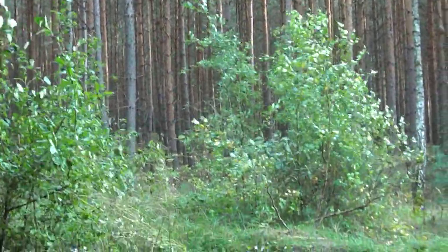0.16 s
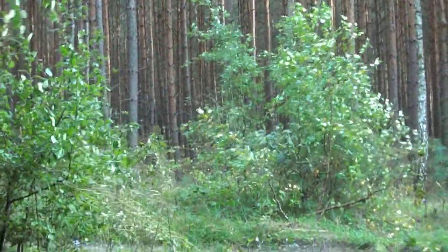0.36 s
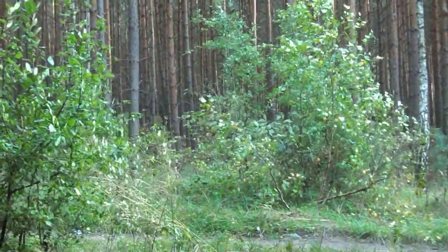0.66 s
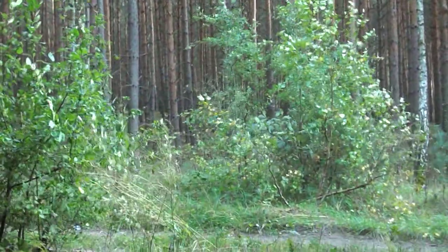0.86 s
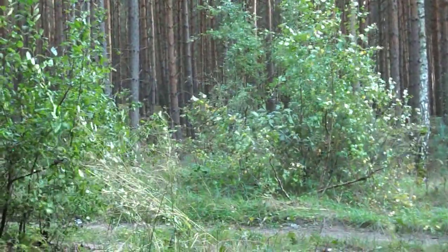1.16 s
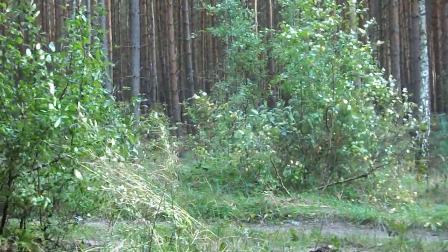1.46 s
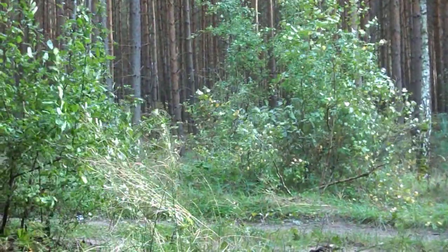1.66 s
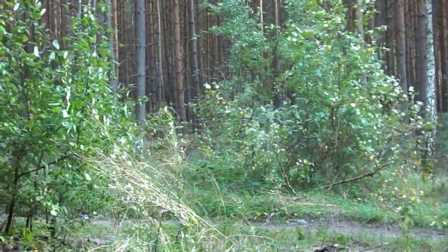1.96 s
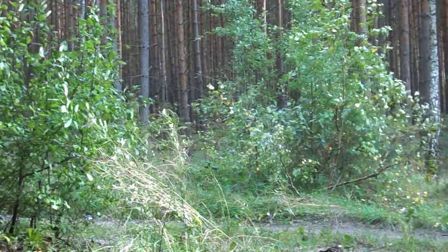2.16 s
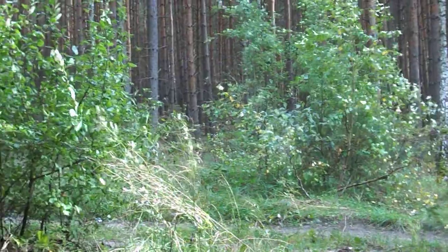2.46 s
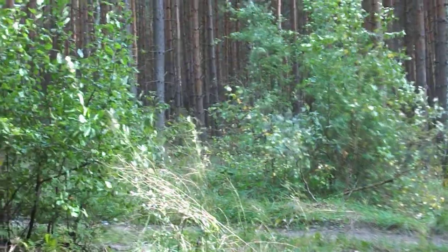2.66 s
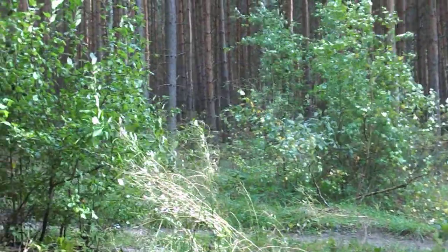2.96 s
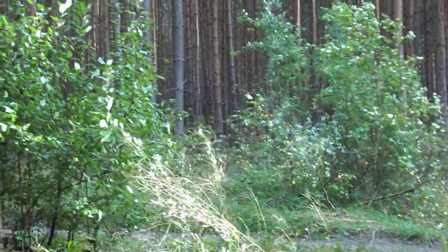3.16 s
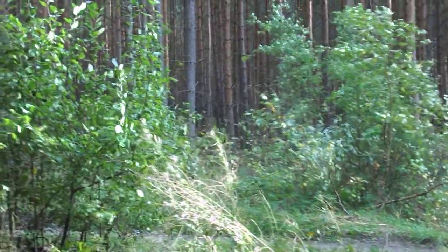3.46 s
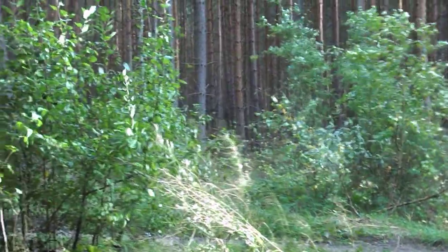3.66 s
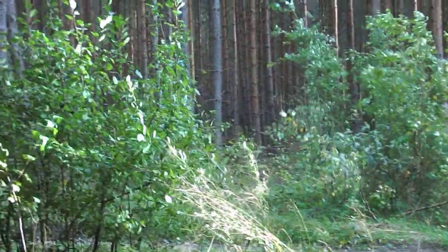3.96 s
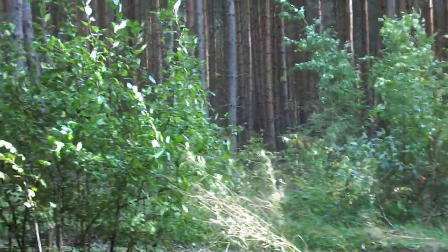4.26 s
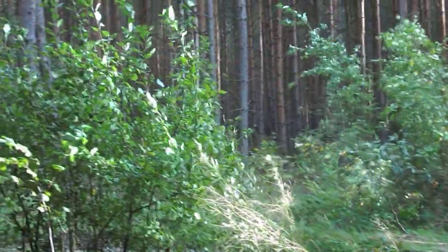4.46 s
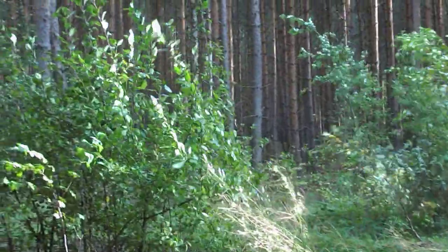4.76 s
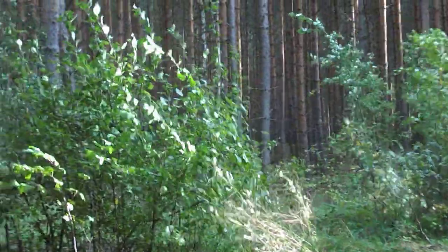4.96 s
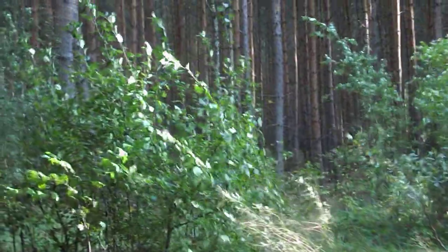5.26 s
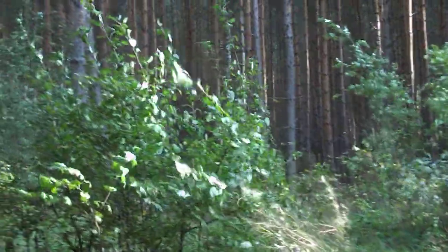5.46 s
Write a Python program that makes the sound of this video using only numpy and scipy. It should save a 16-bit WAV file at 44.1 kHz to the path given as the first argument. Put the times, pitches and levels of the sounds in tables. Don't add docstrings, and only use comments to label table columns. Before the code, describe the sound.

Wind in a pine forest: nearby young leaves rustle in a bright, dense hiss made of countless tiny ticks, over a quieter, smooth low roar from far crowns. The hiss slowly strengthens, holds, then eases slightly. A crisp leaf slap clicks just before the middle, with fainter ones around it. Small recorder outdoors, practically mono, slightly dull at the very top, with a barely perceptible thin whine.

```python
import sys
import numpy as np
from scipy import signal
from scipy.fft import rfft, irfft
from scipy.io import wavfile

SR = 44100
rng = np.random.default_rng(int(sys.argv[2]) if len(sys.argv) > 2 else 0)


def digitize_waveform(pressure):
    field = np.atleast_2d(pressure).T
    bounded = np.clip(field, -1, 1)
    quanta = np.round(bounded * 32767).astype(np.int16)
    wavfile.write(sys.argv[1], SR, quanta)


def field_ratio(decibels):
    return 10 ** (np.asarray(decibels, dtype=float) / 20)


N = 247842


def rms_one(x):
    return x / np.sqrt(np.mean(x ** 2) + 1e-20)


def at_hz(points, hz):
    points = np.array(points)
    return np.interp(np.log(hz + 1e-3), np.log(points[:, 0]), points[:, 1])


def drift(rate_hz):
    step, settling = 40, 2000
    pole = np.exp(-2 * np.pi * rate_hz * step / SR)
    draws = rng.standard_normal(N // step + settling + 2)
    slow = signal.lfilter([1], [1, -2 * pole, pole * pole], draws)[settling:]
    return np.interp(np.arange(N) / step, np.arange(len(slow)), rms_one(slow))


def patchy(source, spectrum, shared_db, own_db, slow_db):
    hz = np.arange(N // 2 + 1) * SR / N
    coloured = rfft(source) * field_ratio(at_hz(spectrum, hz))
    lowest_hz = 31.25
    place = 2 * np.log2(np.clip(hz, lowest_hz, 16000) / lowest_hz)
    together = drift(8.2)
    out = 0
    for band in range(19):
        share = np.clip(1 - abs(place - band), 0, 1)
        flicker_db = shared_db * together + own_db * drift(17.0) + slow_db * drift(0.86)
        out = out + field_ratio(flicker_db) * irfft(coloured * share, N)
    return rms_one(out)


def leaves(level_db):
    # frequency in Hz, level in dB.
    leaf_spectrum = [(300, -52), (1100, -13), (1700, -10.5), (2500, -9), (3300, -6.5), (3800, -5),
                     (5200, -3.5), (6500, -2.5), (7200, -2.5), (8300, -4), (8900, -6), (9500, -8.5),
                     (10200, -10)]
    ticks_per_second = 6000.0
    ticks = (rng.random(N) < ticks_per_second / SR) * rng.standard_normal(N)
    stream = rng.standard_normal(N)
    source = stream + field_ratio(-7.5) * rms_one(ticks)
    return field_ratio(level_db) * patchy(source, leaf_spectrum, shared_db=0.21, own_db=0.15, slow_db=0.34)


def slaps():
    # start in seconds, peak level in dB, frequency in Hz, 60 dB decay in seconds.
    slap_events = [
        (2.5524, -15, 5000, .0022),
        (1.9, -19, 6900, .002),
        (2.8, -25, 2300, 0.0036),
    ]
    out = np.zeros(N)
    t = np.arange(600) / SR
    onset = np.minimum(t / 0.00015, 1)
    for start_s, peak_db, hz, t60 in slap_events:
        at = round(start_s * SR)
        decay = field_ratio(peak_db - 60 * t / t60)
        out[at:at + len(t)] += decay * np.sin(2 * np.pi * hz * t) * onset
    return out


def crowns(level_db):
    # frequency in Hz, level in dB.
    crown_spectrum = [(15, -30), (31, -22), (42, -13.5), (115, -10), (180, -3), (270, -4), (500, -1),
                      (850, -0.5), (1050, -1.5), (1500, -7.5), (2600, -11.5), (6000, -40)]
    source = rng.standard_normal(N)
    return field_ratio(level_db) * patchy(source, crown_spectrum, shared_db=0.48, own_db=-0.2, slow_db=0.34)


def scene():
    # time in seconds, leaf rustle level in dB.
    gust_course = [
        (0, -33.5),
        (1.0, -32.5),
        (2.2, -31.5),
        (3.3, -30.5),
        (4.2, -30.5),
        (4.9, -31.5),
        (5.62, -31.5),
    ]
    time_s, strength_db = np.transpose(gust_course)
    gust_db = np.interp(np.arange(N) / SR, time_s, strength_db)
    swing_db = gust_db - gust_db.mean()
    crown_db = -41 + 0.45 * swing_db
    air = leaves(gust_db) + crowns(crown_db) + slaps()
    return np.array([air, air])


def notch(x):
    # width in Hz, depth in dB.
    notch_shape = (470, -19)
    width_hz, depth_db = notch_shape
    notch_hz, whine_hz, whine_db = 7668, 7638, -70
    w = 2 * np.pi * notch_hz / SR
    a = np.pi * width_hz / SR
    g = field_ratio(depth_db)
    cut = signal.lfilter([1 + a * g, -2 * np.cos(w), 1 - a * g], [1 + a, -2 * np.cos(w), 1 - a], x)
    whine = np.sin(2 * np.pi * whine_hz * np.arange(N) / SR)
    return cut + field_ratio(whine_db + 3.0 * drift(2.5)) * whine


def half_rate(x, guard_hz, smooth_hz):
    guard = signal.butter(14, guard_hz, fs=SR, output="sos")
    kept = signal.sosfilt(guard, x) * (np.arange(N) % 2 == 0)
    smoother = 2 * signal.firwin(65, smooth_hz, window=("kaiser", 9.0), fs=SR)
    return np.convolve(kept, smoother, "same")


def antiphase_noise():
    # centre in seconds, length in seconds, low edge in Hz, high edge in Hz, level in dB.
    noise_burst = (1.6945, .046, 5150, 6320, -41)
    centre_s, length_s, low_hz, high_hz, level_db = noise_burst
    phase = np.clip((np.arange(N) / SR - centre_s) / length_s, -0.5, 0.5)
    window = np.cos(np.pi * phase) ** 2
    band_pass = signal.cheby1(8, 0.5, [low_hz, high_hz], "band", fs=SR, output="sos")
    band = signal.sosfilt(band_pass, rng.standard_normal(N))
    return field_ratio(level_db) * rms_one(band) * window * [[1], [-1]]


def low_pass(x):
    return signal.sosfilt(signal.butter(12, 12410, fs=SR, output="sos"), x)


def record(dry):
    mono = half_rate(notch(dry[0]), guard_hz=10400, smooth_hz=11030)
    mix = np.array([mono, mono]) + antiphase_noise()
    return low_pass(mix)


dry = scene()
out = record(dry)
digitize_waveform(out)
```